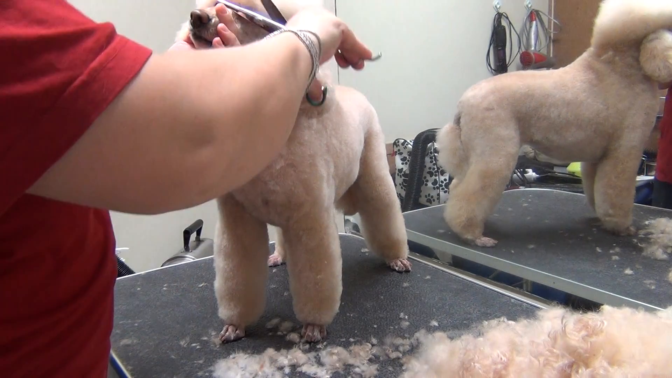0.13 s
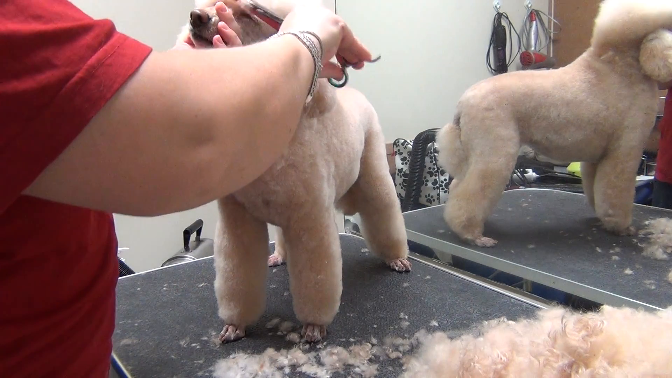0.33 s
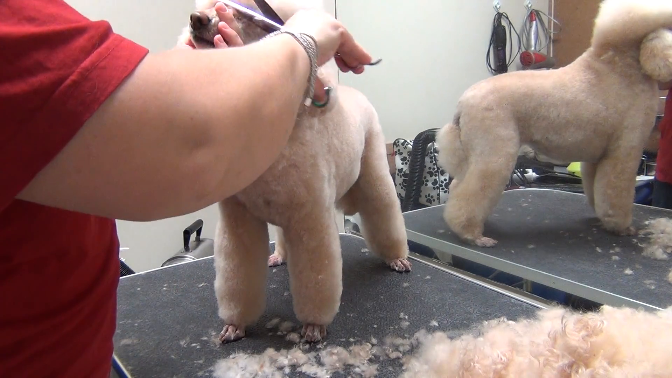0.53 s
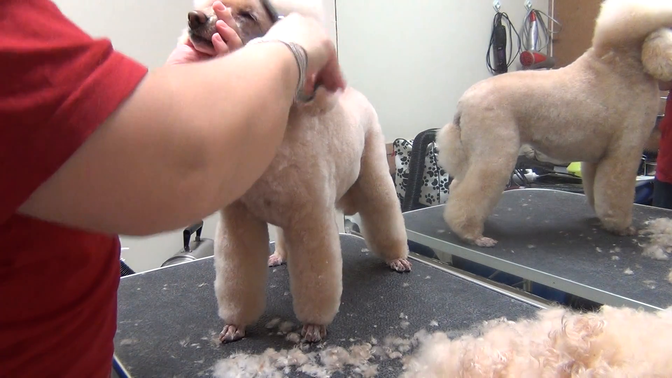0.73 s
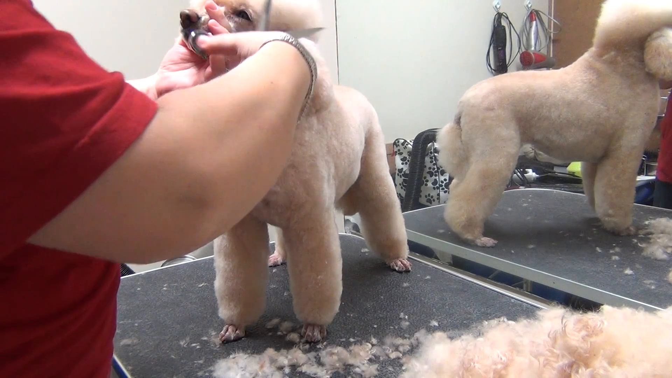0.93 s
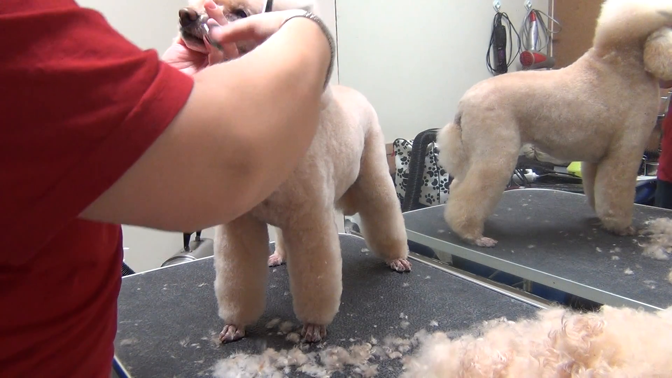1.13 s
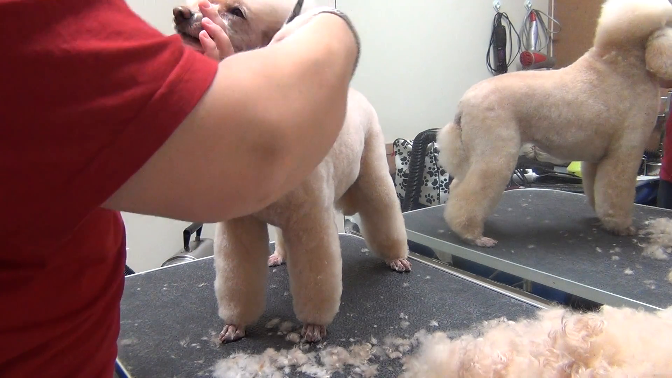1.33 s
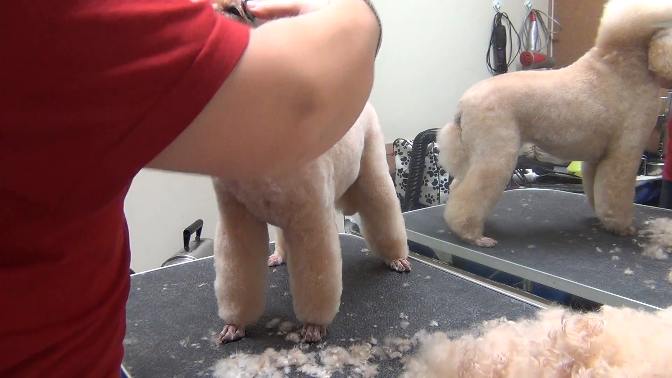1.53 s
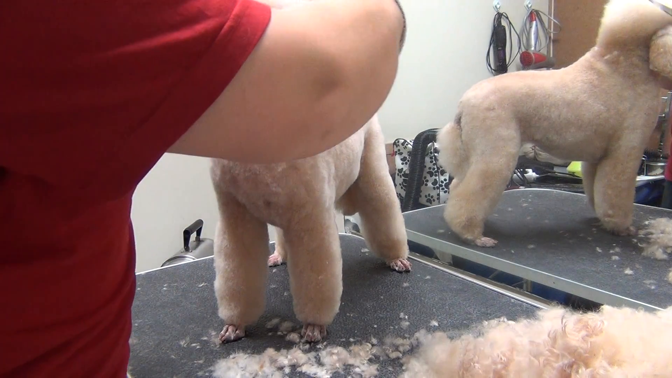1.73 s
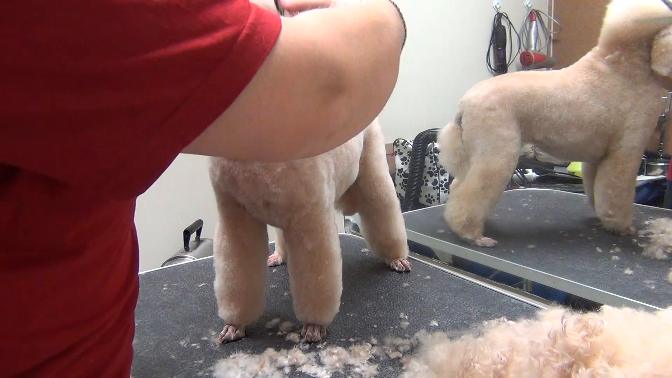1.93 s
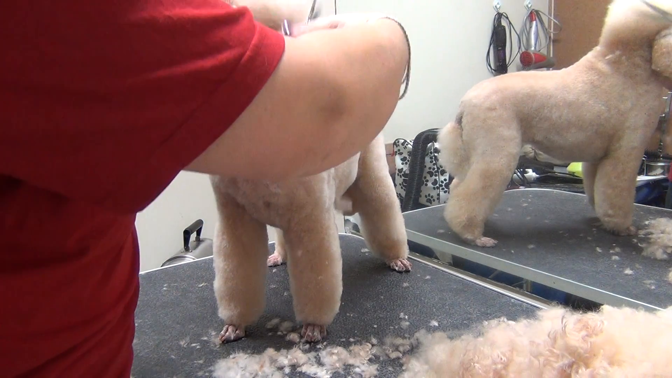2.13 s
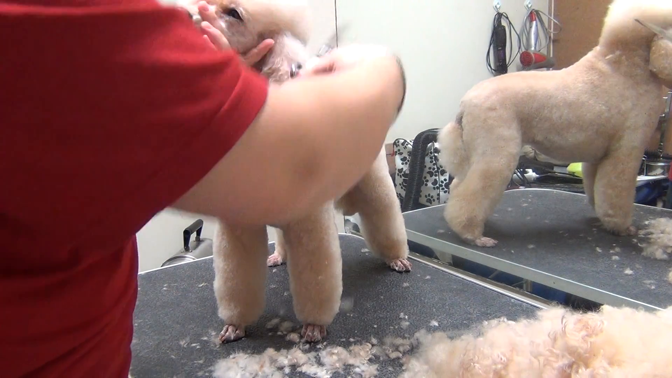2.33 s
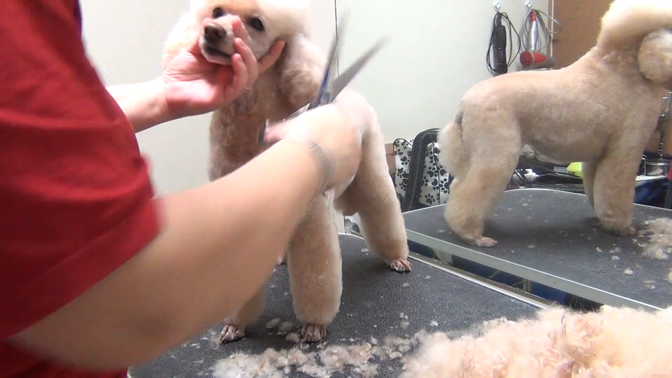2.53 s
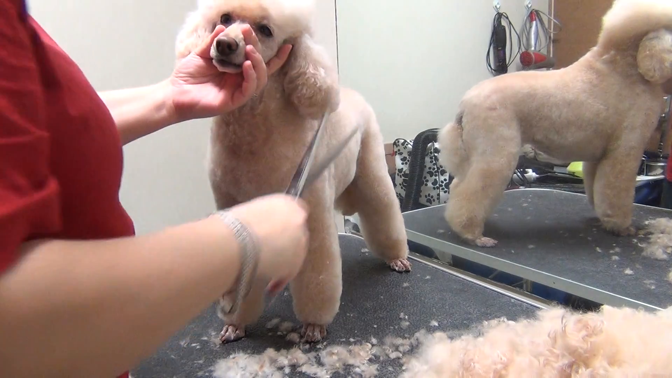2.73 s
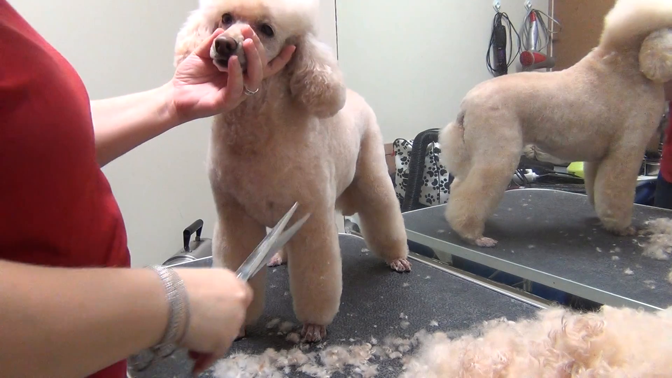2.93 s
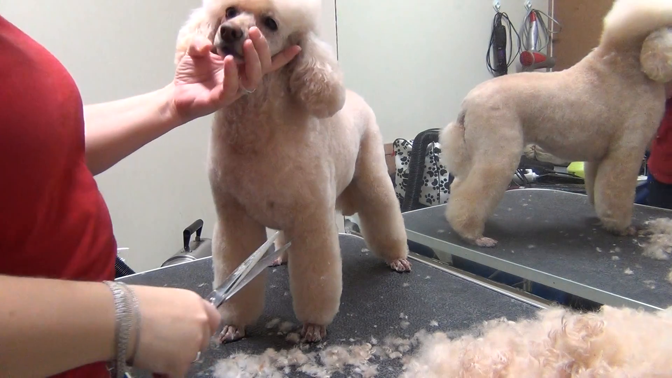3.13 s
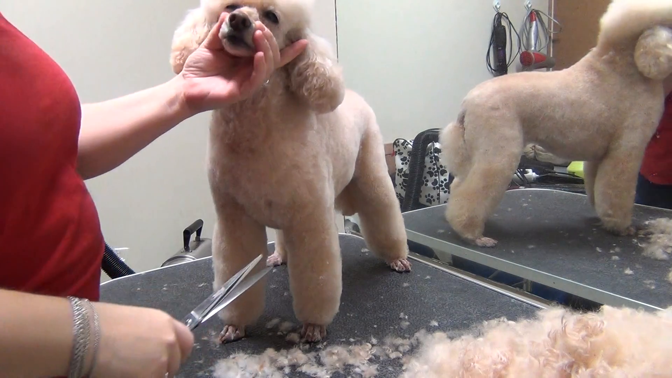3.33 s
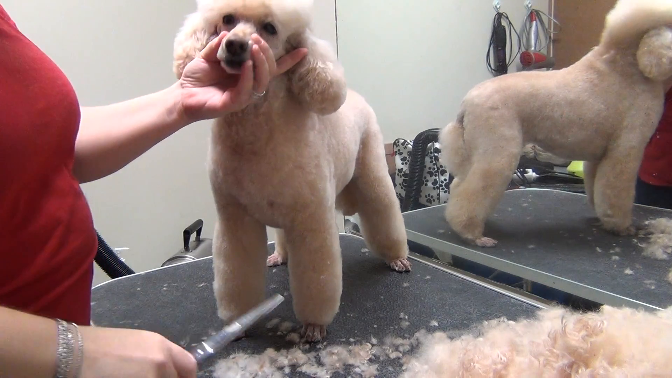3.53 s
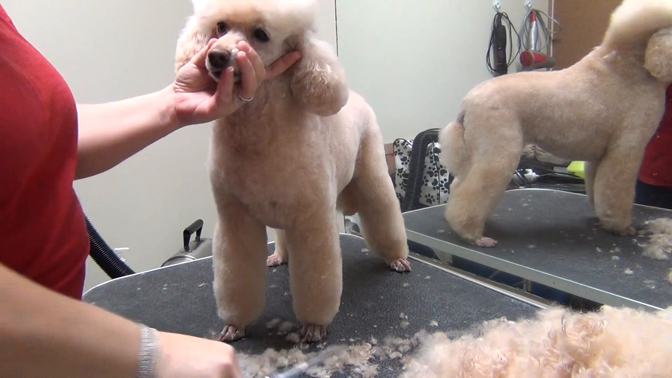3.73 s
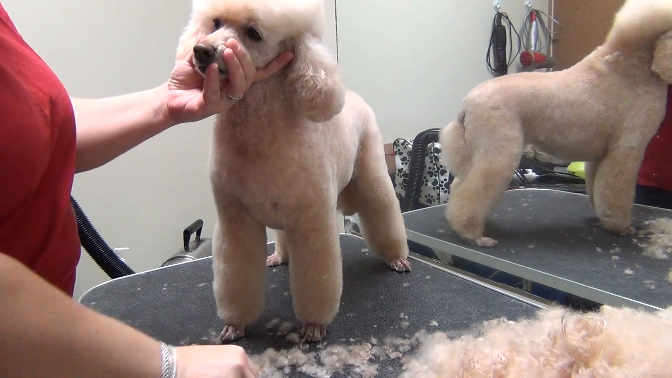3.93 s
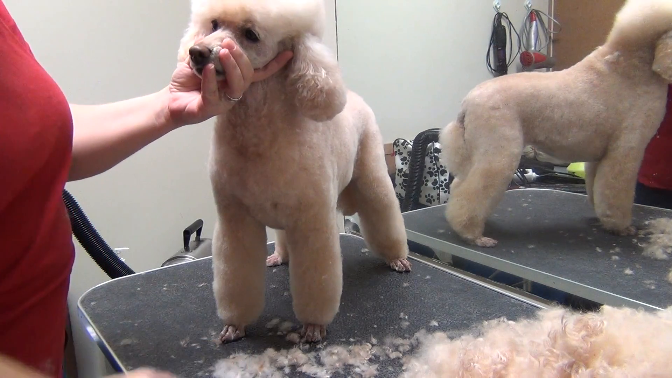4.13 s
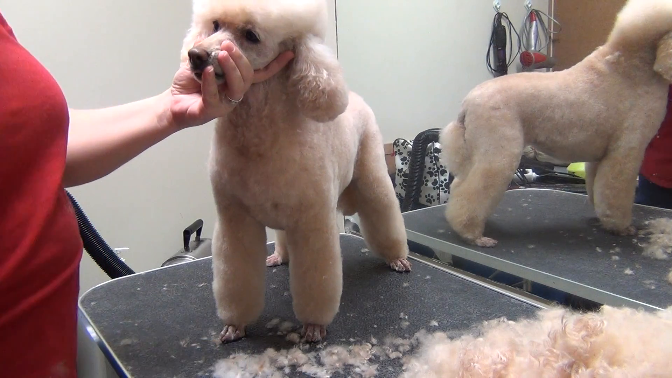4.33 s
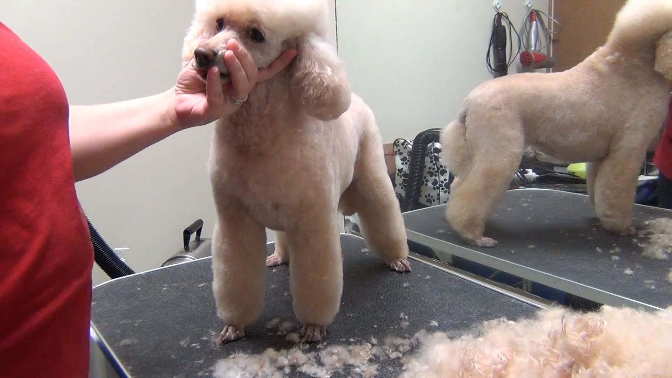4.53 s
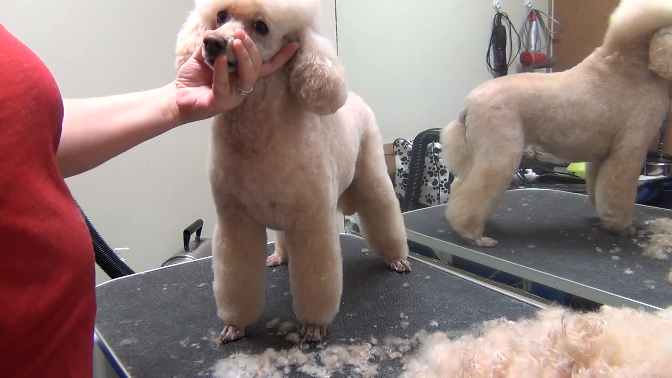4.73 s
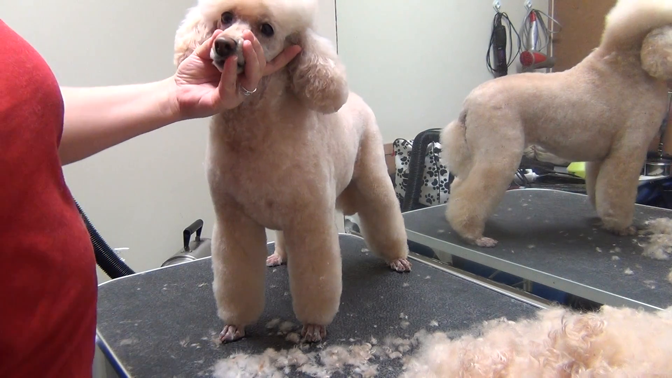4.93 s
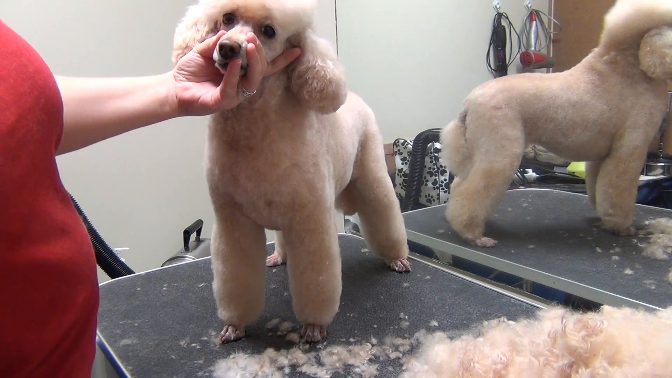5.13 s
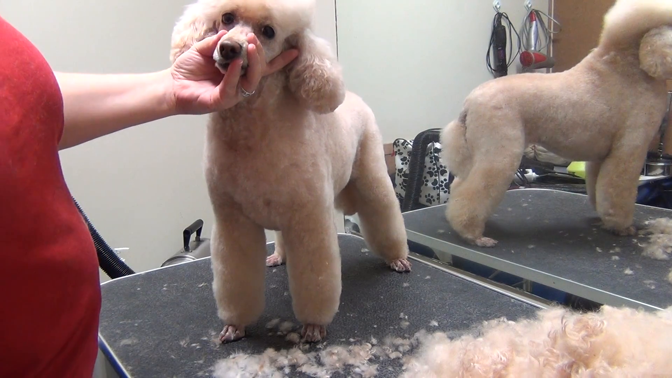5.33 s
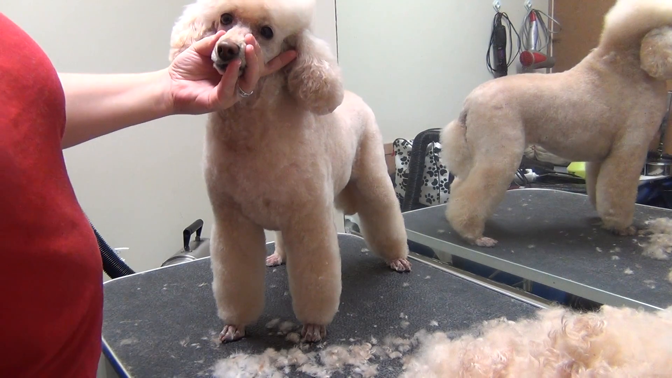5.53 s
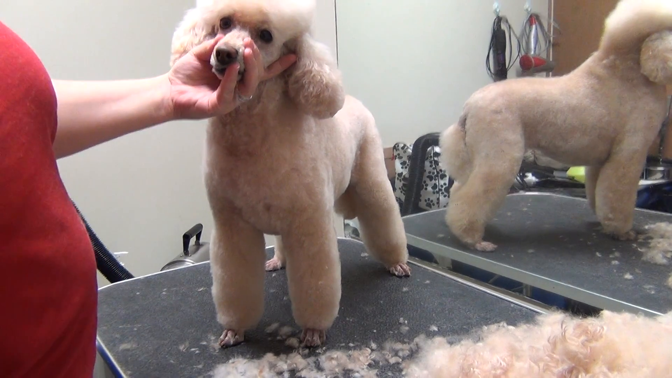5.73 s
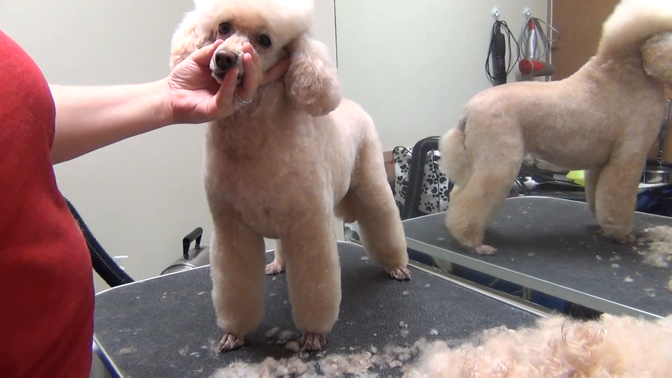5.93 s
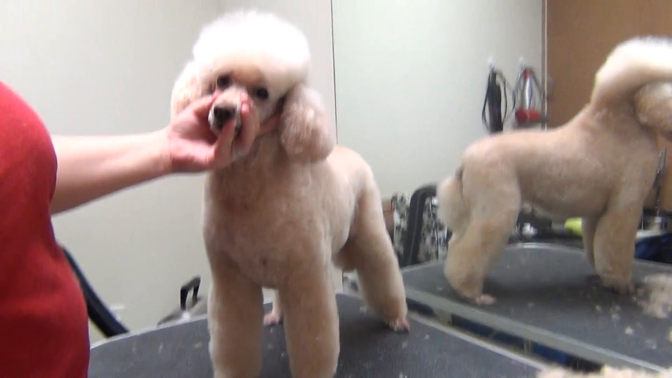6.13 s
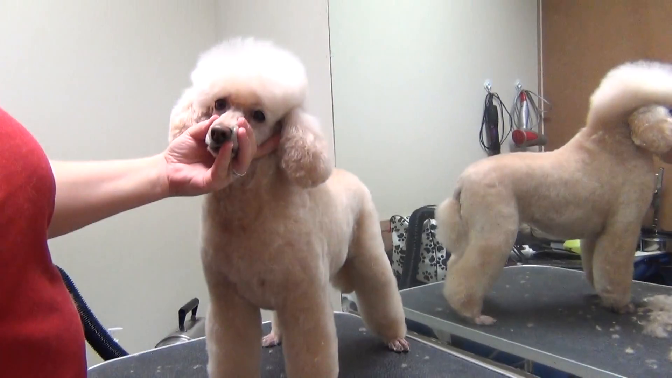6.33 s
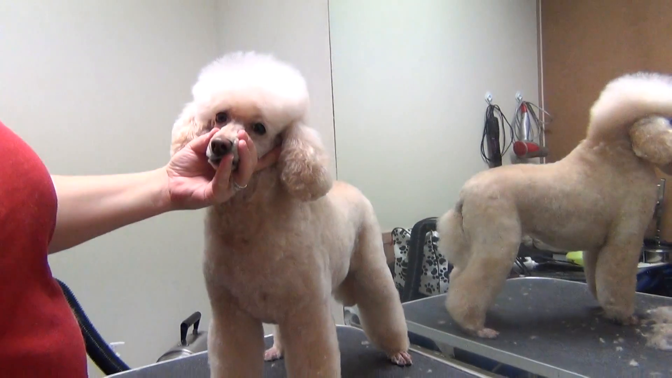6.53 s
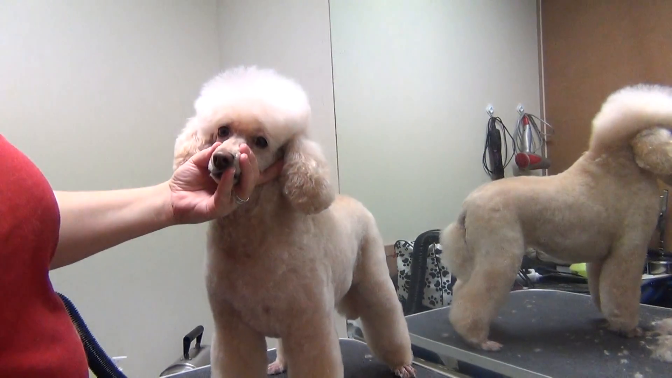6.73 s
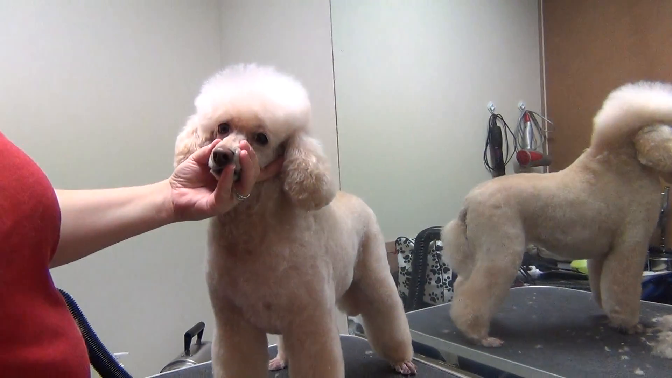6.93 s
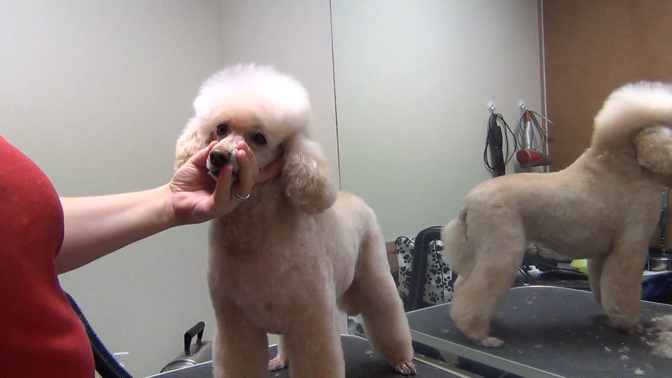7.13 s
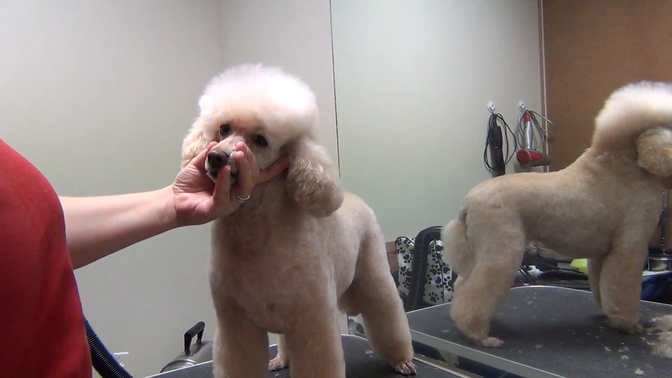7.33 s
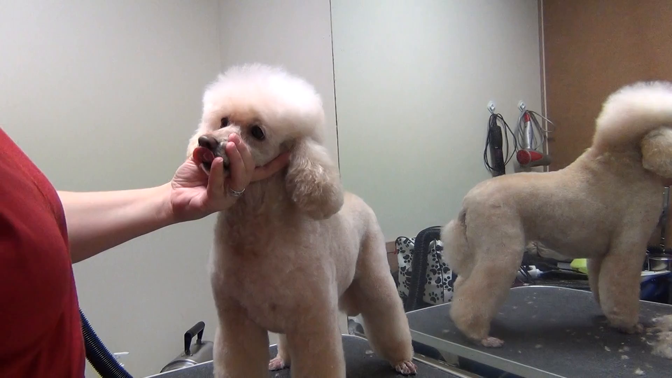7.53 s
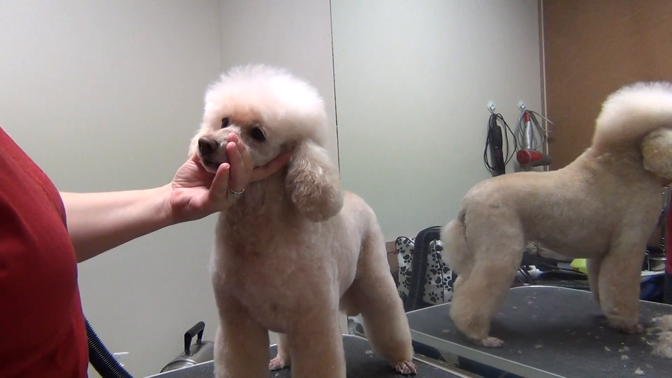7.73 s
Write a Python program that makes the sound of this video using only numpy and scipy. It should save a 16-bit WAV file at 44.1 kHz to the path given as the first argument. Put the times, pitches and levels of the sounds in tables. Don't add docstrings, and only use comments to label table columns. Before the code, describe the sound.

In a small hard-walled room, steel scissors snip through curly dog hair with bright, briefly ringing clicks and fine scrapes. After a pause they drop and rattle on a hollow table. Cloth rustles, light taps follow, then plastic creaks and clacks very close to the microphone. It ends with faint taps, rubbing and soft low knocks over quiet airflow.

```python
import sys
import numpy as np
from scipy import signal
from scipy.fft import rfft, irfft, next_fast_len
from scipy.io import wavfile
from scipy.ndimage import uniform_filter1d

SR = 44100
rng = np.random.default_rng(int(sys.argv[2]) if len(sys.argv) > 2 else 0)


def nominal_scale(level):
    x = np.asarray(level, float) / 20
    return 10 ** x


def bounce(signal):
    frames = np.transpose(np.atleast_2d(signal))
    limited = np.clip(frames, -1, 1)
    pcm = np.round(limited * 32767).astype(np.int16)
    wavfile.write(sys.argv[1], SR, pcm)


N = 347067
SPAN, LEAD = 24576, SR // 10
HZ = np.fft.rfftfreq(SPAN, 1 / SR)
T = (np.arange(SPAN) - LEAD) / SR

# f/Hz, left-right level/dB
PORT_LEAN = [(60, -4.5), (120, -4), (250, -2.5), (600, -.4), (2000, 0)]


def unit(x):
    return x / np.sqrt(np.mean(x ** 2) + 1e-20)


def along(points, hz):
    f, v = np.transpose(points)
    return np.interp(np.log(hz + 1), np.log(f + 1), v)


def level_curve(times, levels_db):
    return nominal_scale(np.interp(np.arange(N) / SR, times, levels_db, -200, -200))


def bandwidth(t60):
    return np.log(1000) / np.pi / t60


def causal(points):
    cepstrum = irfft(np.log(nominal_scale(along(points, HZ)) + 1e-6))
    half = SPAN // 2 - 1
    fold_forward = np.r_[1, np.full(half, 2), 1, np.zeros(half)]
    return np.exp(rfft(cepstrum * fold_forward))


def resonances(modes, drift=0):
    total = 0
    for k, (hz, width, db) in enumerate(modes):
        centre = hz * (1 + drift * rng.standard_normal())
        strength = nominal_scale(db + 2.5 * rng.standard_normal())
        damping = 1j * HZ * width
        total = total + (-1) ** k * strength * damping / (centre ** 2 - HZ ** 2 + damping)
    return total


def pair(z, hz, alike):
    turn = np.arccos(np.clip(along(alike, hz), 0, .995)) / 2
    mid, side = z[0] * np.cos(turn), z[1] * np.sin(turn)
    lean = along(PORT_LEAN, hz) / 2
    return np.array([(mid + side) * nominal_scale(lean), (mid - side) * nominal_scale(-lean)])


def rush(spectrum, patchy_db, grain_db, smooth_hz=30000):
    # f/Hz, left-right likeness
    field_likeness = [(50, 0.442), (130, 0.8076), (290, 0.8354), (640, 0.91897), (1410, 0.9333),
                      (3100, 0.94763), (6820, 0.8435), (15000, 0.965)]
    grains = nominal_scale(grain_db * np.repeat(rng.exponential(size=N // 64 + 1), 64)[:N])
    z = signal.stft(grains * rng.standard_normal((2, N)), nperseg=512)[2]
    patches = uniform_filter1d(rng.standard_normal(z.shape[1:]), size=6, axis=0)
    patches = unit(uniform_filter1d(patches, size=10, axis=1))
    bins = np.fft.rfftfreq(512, 1 / SR)[:, None]
    depth_db = patchy_db / (1 + (bins / smooth_hz) ** 2)
    x = signal.istft(z * nominal_scale(depth_db * patches), nperseg=512)[1][:, :N]
    m = next_fast_len(N)
    hz = np.fft.rfftfreq(m, 1 / SR)
    coloured = rfft(x, m) * nominal_scale(along(spectrum, hz))
    return unit(irfft(pair(coloured, hz, field_likeness), m)[:, :N])


def burst(t60, slide=1e-4, slide_db=0, rough_db=4):
    swell = nominal_scale(slide_db + 20 * T / abs(slide))
    chatter = nominal_scale(-60 * abs(T) / abs(t60))
    grit = nominal_scale(rough_db * np.repeat(rng.standard_normal(SPAN // 32), 32))
    return rfft(np.where(T < 0, swell, chatter) * grit * rng.standard_normal(SPAN))


def add(out, s, sound, db, wet_db, pan_db=0):
    # f/Hz, t60/s
    room_decay = [(200, 0.40405), (2000, 0.25414), (8000, 0.22755), (14000, 0.14813)]
    # f/Hz, level/dB
    wall_colour = [(100, -1), (1000, 1.5), (3000, -2.5), (5000, -3), (7500, 0), (12000, -5.5)]
    # f/Hz, likeness
    wall_likeness = [(100, .85), (1000, .88), (3000, .85), (6500, .6), (9000, .68), (14000, .8)]
    hz, t, z = signal.stft(rng.standard_normal((2, SR // 2)), SR, nperseg=256)
    decay = nominal_scale(-60 * t / along(room_decay, hz)[:, None])
    tail = signal.istft(z * decay, SR, nperseg=256)[1]
    tail = np.pad(tail / np.linalg.norm(tail[0]), ((0, 0), (200, 0)))
    direct = nominal_scale((along(PORT_LEAN, HZ) + pan_db) / [[2], [-2]])
    walls = nominal_scale(wet_db + along(wall_colour, HZ)) * pair(rfft(tail, SPAN), HZ, wall_likeness)
    x = irfft(sound * (direct + walls))
    piece = out[:, round(s * SR) - LEAD:][:, :SPAN]
    piece += nominal_scale(db) / abs(irfft(sound)).max() * x[:, :piece.shape[1]]


def steel(shank_db, pivot_db, tone):
    # f/Hz, width/Hz, level/dB
    blade_modes = [(6695.6, 68, -22.5), (7234.1, 105.54, 0), (7400, 33, -42), (7700, 185.2, 4.5),
                   (8370, 214.8, -6), (8560, 191.4, 3.5), (9561.5, 92.5, 2.5), (10194, 36, -10.5),
                   (10517, 401.2, -8.5), (11704, 70.74, -3.5), (13750, 155, -40.5)]
    # f/Hz, width/Hz, level/dB
    shank_modes = [(2050, 131.5, -12), (2876, 337.6, 1), (3300, 372, -10), (3740.7, 639, -15.5)]
    # f/Hz, width/Hz, level/dB
    pivot_modes = [(4400, 600, -1), (5100, 600, 0), (5800, 500, -2)]
    # f/Hz, level/dB per Hz
    dense_modes = [(3240, -20), (5500, -14.5), (6550, -3.5), (7720, 1.5), (8710, -1), (11100, -25),
                   (13100, -12.5), (16000, -31.5)]
    # f/Hz, level/dB
    dull_knock = [(200, -106), (500, -22.5), (1000, -7.5), (2500, -14), (4500, -1.5), (7000, -11),
                  (12000, -61.5)]
    wash = causal([(1000, -83.5)] + dense_modes)
    blades = nominal_scale(-0.5) * resonances(blade_modes, drift=0.029534)
    blades = blades + resonances([tone])
    pivot = nominal_scale(pivot_db + 9.5) * resonances(pivot_modes, drift=0.05703)
    shanks = resonances(shank_modes, drift=0.00893) + nominal_scale(-6.0) * causal(dull_knock)
    return wash + blades + pivot + nominal_scale(shank_db + 9.0) * shanks


def scissors():
    # t/s, catch level/dB, shank share/dB, pivot share/dB, loudest f/Hz
    closings = [
        (0.4038, -23, -14.5, -15, 8249),
        (0.737, -40, -15.5, -11, 8449),
        (1.3036, -27.5, -11.5, -13, 7853),
        (1.7225, -27.5, -11, -23, 8370),
        (2.0729, -26.5, -12.5, -25, 7796),
        (2.3014, -25.5, -12, -21.5, 7435),
        (2.3184, -28.5, -20, -27, 7529),
        (2.7676, -56.5, -13.5, -16, 7322),
    ]
    # t/s, catch level/dB, shank share/dB, pivot share/dB, loudest f/Hz
    openings = [
        (0.5617, -39, -29, -20.5, 7694),
        (0.8954, -33.5, -30.5, -18, 8055),
        (1.4355, -34, -25, -15.5, 7521),
        (1.6935, -30.5, -33, -27.5, 8228),
        (1.8485, -40, -34.5, -24, 8068),
        (2.1952, -35.5, -23.5, -18.5, 7776),
        (2.462, -35, -30.5, -22.5, 7903),
        (3.566, -40.5, -26.5, -14.5, 7984),
    ]
    # t/s, peak level/dB, loudest f/Hz, swell/s, handle share/dB
    scrapes = [(0.3301, -46, 8466, 0.03673, -32), (0.359, -41, 8282, 0.036, -28),
               (0.396, -40, 8582, 0.01731, -18), (0.5495, -41.5, 7029, 0.0101, -38),
               (0.704, -51.5, 7258, 0.01321, -26.5), (0.7217, -41.5, 7084, 0.01168, -22),
               (0.7418, -40, 8254, 0.01048, -20.5), (0.748, -37.5, 7990, 0.005, -19.5),
               (0.8853, -42, 7432, 0.00682, -40.5), (1.258, -46.5, 7424, 0.02774, -25.5),
               (1.2681, -42.5, 8080, 0.00972, -22.5), (1.2841, -40, 8312, 0.01147, -29),
               (1.321, -42, 7895, 0.0061, -22), (1.428, -42, 7917, 0.01285, -34.5),
               (1.68, -47, 7179, 0.0178, -22.5), (1.7173, -32.5, 8370, 0.00403, -24.5),
               (1.737, -35, 8560, 0.00567, -25), (1.858, -38.5, 8054, 0.02402, -31.5),
               (2.041, -48, 6691, 0.01177, -21), (2.0557, -34.5, 8364, 0.00376, -23),
               (2.085, -38.5, 7700, 0.00443, -14.5), (2.187, -42.5, 9595, 0.01357, -38),
               (2.275, -46, 6489, 0.00826, -26), (2.2876, -35.5, 9229, 0.004157, -32.5),
               (2.4482, -41, 7115, 0.00381, -41), (2.834, -57, 6934, 0.0265, -29),
               (3.537, -49, 7400, 0.01696, -24.5), (3.558, -45.5, 8165, 0.0089, -34)]
    # t/s, peak level/dB, handle share/dB, chatter t60/s, loudest f/Hz
    bounces = [
        (3.936, -23.5, 9, 0.0414, 8422),
        (3.9403, -26, -18.5, 0.03823, 5964),
        (3.9407, -20, -11.5, 0.13376, 8400),
        (3.9835, -24, -17.5, 0.0545, 8560),
        (4.0039, -16.5, -26.5, 0.03136, 8663),
        (4.019, -21, -34.5, 0.1082, 8685),
        (4.0374, -24.5, -47, 0.0731, 7529),
        (4.05, -24.5, -30.5, 0.12654, 7500),
        (4.5953, -37, -51, 0.00585, 8432),
    ]
    # f/Hz, width/Hz, level/dB
    handle_modes = [(2050, 244.5, 0.5), (2414.2, 84, 3), (2598.3, 88.8, 7), (4150, 691.7, -8)]
    # f/Hz, level/dB
    touch_colour = [(300, -26), (1500, -14), (6000, 11.5), (13000, 5)]
    # t/s, peak level/dB, f/Hz, t60/s
    lone_rings = [
        (.739, -43, 4733, 0.1812),
        (0.739, -47, 5163, 0.1697),
        (.893, -54, 4150, 0.0551),
        (1.866, -54.5, 4685, 0.0435),
        (2.463, -54.5, 4238, 0.071),
        (4.04, -32, 10640, 0.06054),
        (4.39, -52, 807, 0.0432),
        (5.752, -58.5, 5800, 0.03363),
        (6.987, -45, 277.3, 0.02538),
    ]
    out = np.zeros((2, N))
    for strokes, chatter_t60 in ((closings, 0.06498), (openings, 0.07167)):
        for s, db, shank_db, pivot_db, hz in strokes:
            ring = steel(shank_db, pivot_db, (hz, 160, 5))
            click = nominal_scale(shank_db + 6.0) * burst(0.004574) * causal(touch_colour)
            contact = burst(chatter_t60, 0.00586, -4) + 1.1393 * burst(0.001173)
            add(out, s, contact * ring + click, db, wet_db=-2.0)
    for s, db, hz, swell, handle_db in scrapes:
        edges = steel(handle_db, handle_db + 8, (hz, 200, 3))
        add(out, s, burst(0.10937, swell, 0, 2.674) * edges, db, wet_db=-2.5)
    for s, db, handle_db, t60, hz in bounces:
        ring = steel(handle_db - 10.5, -35.5, (hz, 90, 4))
        ring = ring + nominal_scale(handle_db + 8.5) * resonances(handle_modes)
        add(out, s, burst(t60) * ring, db, wet_db=-4.0)
    for s, db, hz, t60 in lone_rings:
        add(out, s, burst(0.01831) * resonances([(hz, bandwidth(t60), 0)]), db, wet_db=-7.0)
    return out


def table():
    # t/s, peak level/dB, dense share/dB, tilt/dB per octave
    blows = [
        (3.937, -35, 5.5, -8.5),
        (3.94, -28.5, -1.5, 0.5),
        (3.984, -32, 4, -3.5),
        (4.003, -31, 0.5, -1.5),
        (4.024, -28, -3, -6.5),
        (4.044, -35, -2, -3.5),
    ]
    # f/Hz, level/dB, t60/s
    panel_modes = [(122.2, -13, 0.3854), (165, -15.5, 0.09823), (211.21, 1, 0.2548), (255.14, -5.5, 0.9596),
                   (262.72, -4, 0.25), (303.37, -4, 0.13445), (408.39, -1.5, 0.3127), (427.88, -6, 0.1912),
                   (565.07, -5, 0.1687), (676.84, -6, 0.11015), (801.12, -9, 0.2398), (1215.6, -12, 0.1654)]
    # f/Hz, level/dB per Hz
    thud_colour = [(40, -50), (90, -5.5), (250, -3.5), (590, -1.5), (1220, -8), (2300, -14), (3300, -12.5),
                   (6000, -77.5)]
    out = np.zeros((2, N))
    thud = causal(thud_colour)
    for s, db, thud_db, tilt_db in blows:
        panel = []
        for hz, mode_db, t60 in panel_modes:
            panel.append((hz, bandwidth(t60), mode_db + tilt_db * np.log2(hz / 256)))
        add(out, s, burst(0.000654) * resonances(panel), db, wet_db=-9.0)
        add(out, s, burst(0.10796) * thud, db + thud_db - 1.0, wet_db=-5.5)
    return out


def mount():
    # t/s, peak level/dB, pitch f/Hz, low body/dB
    clack_slips = [(5.773, -23.5, 5588, -34), (5.7776, -21, 3927, -17.5), (5.787, -28, 2448, -15.5),
                   (5.7956, -14, 4866, -55), (5.7998, -16.5, 5075, -17.5), (5.8506, -26.5, 3553, -16),
                   (5.8578, -25, 8196, -23.5), (5.8616, -33.5, 5454, -16.5), (5.8732, -27.5, 4099, -27.5),
                   (5.904, -30.5, 2048, -24.5), (5.906, -34.5, 2079, -3), (5.9233, -33, 3300, -13),
                   (5.9222, -25.5, 5014, -24.5), (5.932, -28.5, 7400, -35.5), (5.9447, -26.5, 8073, -31.5),
                   (5.952, -23, 3967, -25), (5.9543, -21.5, 2414, -14), (5.9625, -27, 5703, -26.5),
                   (5.984, -30, 5086, -24), (6.0245, -9, 6739, -24.5), (6.0243, -34, 3102, -20.5),
                   (6.0319, -21, 4591, -23.5)]
    # t/s, peak level/dB, pitch f/Hz, low body/dB, chatter t60/s
    tap_slips = [(4.678, -52.5, 8005, -34.5, 0.00961), (4.7065, -57, 2710, -28, 0.01524),
                 (4.7315, -43.5, 8553, -15, 0.0095), (4.8316, -52.5, 2430, -15, 0.1448),
                 (4.9749, -45.5, 2346, -5.5, 0.177), (4.98, -48.5, 5110, -20, 0.2335),
                 (5.015, -49.5, 5420, -18, 0.0954), (5.0274, -56.5, 2388, -23.5, 0.04515),
                 (5.0966, -46, 2050, -27.5, 0.03226), (5.11, -48.5, 2003, -20.5, 0.0218),
                 (5.164, -51, 4803, -22, 0.0201), (5.175, -54.5, 1903, -21.5, 0.0771),
                 (5.2393, -54.5, 3539, -24, .02), (5.5785, -53, 4773, -28.5, 0.08),
                 (5.659, -49.5, 5105, -26.5, 0.0782), (5.678, -46.5, 2996, -11, 0.0213),
                 (5.689, -41, 4955, -17.5, 0.03608), (6.2024, -51.5, 1523, -6.5, 0.0595),
                 (6.534, -56.5, 9495, -40, .008), (6.8535, -43.5, 4250, -20, 0.0205),
                 (6.8694, -52, 2070, -8.5, 0.02935), (6.8853, -53, 5062, -10, .05),
                 (6.9187, -45.5, 2044, -15, 0.03307), (6.9435, -41, 6270, -16, .03),
                 (6.95, -46, 5472, -18.5, 0.1223), (6.9655, -44.5, 5000, -29, .03),
                 (6.9673, -36.5, 1892, -18, 0.0362), (6.9875, -49, 1500, 0, 0.02005)]
    # f/Hz, level/dB per Hz
    crack_colour = [(200, -48.5), (880, -20), (1500, -12.5), (1930, 1), (4110, -5), (4520, -3.5),
                    (4930, -3), (8070, -4), (10000, -21), (13000, -30), (22000, -120)]
    # f/Hz, level/dB
    shell_colour = [(80, -49), (250, -13), (500, -9.5), (1000, 2.5), (1800, 5), (3000, -0.5), (6000, -73.5)]
    # f/Hz, level/dB
    edge_colour = [(3000, -71.5), (6000, -28.5), (9000, -15.5), (13000, -22.5), (16000, -16.5)]
    out = np.zeros((2, N))
    crack, shell, edge = causal(crack_colour), causal(shell_colour), causal(edge_colour)
    clacks = [(*row, 0.02) for row in clack_slips]
    # sharp edge/dB, own pitch/dB, its width over its frequency
    kinds = ((clacks, -21, 6, 0.1224), (tap_slips, -41.5, 11.67, 0.2624))
    for slips, sharp_db, pitch_db, relative_width in kinds:
        for s, db, hz, low_db, t60 in slips:
            own = 1 + resonances([(hz, relative_width * hz, pitch_db)])
            body = crack * own + nominal_scale(low_db + 14.5) * shell + nominal_scale(sharp_db + 15.5) * edge
            chatter = burst(t60, 0.0010791, 11.027, rough_db=1.5)
            release = 1.6844 * burst(0.003, 0.0004899, -9.5)
            add(out, s, (chatter + release) * body, db + 1.5, wet_db=-21, pan_db=rng.normal(0, 1))
    return out


def thumps():
    # t/s, peak level/dB, f/Hz, t60/s
    knocks = [(4.4, -69.5, 264, 0.178), (4.967, -59, 145.7, 0.1659), (5.239, -61.5, 87.22, 0.1388),
              (5.582, -56.5, 139.4, 0.2126), (5.619, -65, 133.5, 0.0629), (5.85, -53, 90.14, 0.0918),
              (6.188, -58, 325, 0.01438), (6.966, -59.5, 140, 0.1267), (6.995, -56, 136.6, 0.1356),
              (7.578, -61, 191.6, 0.1396), (7.62, -53, 169.4, 0.0561), (7.648, -48.5, 149.3, 0.084),
              (7.708, -51.5, 165, 0.0359)]
    out = np.zeros((2, N))
    for s, db, hz, t60 in knocks:
        soft = resonances([(hz, bandwidth(t60), 0)]) / (1 + 1j * HZ / 500)
        add(out, s, burst(.06, .008, 0, rough_db=1) * soft, db, wet_db=-4.0)
    return out


def sleeve():
    # f/Hz, level/dB per Hz
    fold_colour = [(88, -43.5), (150, -19.5), (304, -1), (367, -4.5), (443, 0), (661, -3.5), (2500, -12),
                   (3250, -47), (5500, -120)]
    # f/Hz, level/dB per Hz
    brush_colour = [(710, -19), (1200, -8), (2410, -1.5), (2820, -1), (3960, -0.5), (4360, -2.5), (7230, 4),
                    (10600, -7.5), (15000, -38)]
    # t/s, brush level/dB, rise/s and fall/s per 20 dB, fold over brush/dB
    movements = [(3.2, -72.5, 0.1958, 1, 1.5), (3.564, -68.5, 0.1147, -7.3231, 1),
                 (3.9, -75, 0.204, 8.5, -23.5), (4.131, -54.5, 0.2502, 0.4011, -2),
                 (4.394, -72.5, 0.0254, -7.5, -6), (4.63, -74.5, 0.03, 2, 3),
                 (4.977, -60.5, 0.00629, 0.1178, 4), (5.03, -66, 0.1034, -0.1498, 2.5),
                 (5.17, -66.5, 0.0595, 0.0619, 7), (5.3, -66.5, 0.894, 0.5, 5),
                 (5.592, -56.5, 0.01583, 0, -1.5), (5.69, -68.5, 0.0914, -0.6106, -17),
                 (5.76, -67, 0.0232, -0.6857, 4), (6.05, -75, 2.306, -0.0031, -22.5),
                 (6.962, -63, 0.0735, -0.2967, -3), (7.45, -69, 0.315, 1.63, 1),
                 (7.005, -68, 0.0263, 0.1966, -12.5), (7.6, -63.5, 0.08, 0.2558, -6.5),
                 (7.715, -59.5, 0.0516, -0.0419, -5), (7.748, -61.5, 0.0881, -3.2252, -8),
                 (7.87, -57.5, 0.01584, -2, -6.5)]
    fold = rush(fold_colour, 3.704, 0.6254)
    brush = rush(brush_colour, 1.5, 1.2)
    s, db, rise, fall, fold_db = np.transpose(movements)[:, :, None]
    since = np.arange(N) / SR - s
    effort = nominal_scale(db - 20 * np.where(since < 0, -since / abs(rise), since / abs(fall)))
    fold_gain = np.linalg.norm(effort * nominal_scale(fold_db), axis=0)
    brush_gain = np.linalg.norm(effort, axis=0)
    return fold_gain * fold + brush_gain * brush


def lens_motor():
    # t/s, f/Hz, level/dB
    motor_run = [
        (6.3, 3070, -81),
        (6.38, 3150, -74.5),
        (6.65, 3400, -73.5),
        (6.85, 3660, -74),
    ]
    t = np.arange(N) / SR
    times, pitches, levels_db = np.transpose(motor_run)
    pulses = np.sin(np.pi * 25 * (t - .003)) ** 6
    phase = 2 * np.pi * np.cumsum(np.interp(t, times, pitches)) / SR
    return level_curve(times, levels_db) * pulses * np.sin(phase)


def air():
    # f/Hz, level/dB per Hz
    flow_colour = [(15, -43), (25, -12), (97, -3), (300, -6.5), (818, -8.5), (1190, -13), (3340, -16.5),
                   (16000, -22)]
    # t/s, level/dB
    flow_level = [
        (0.0, -67.5),
        (2.2, -65),
        (2.87, -66),
        (3.99, -70),
        (5.96, -65),
        (6.2, -68.5),
        (7.87, -69),
    ]
    # f/Hz, level/dB per Hz
    duct_colour = [(600, -120), (800, -11), (890, -3.5), (960, -10), (1200, -120)]
    # f/Hz, level/dB per Hz
    circuit_colour = [(13000, -120), (14100, -15), (14400, -4), (14900, 2.5), (15200, 1), (16500, -120)]
    # f/Hz, rms level/dB
    whine_lines = [(15525, -89.5), (15574, -89), (15625, -82), (15676, -84.5), (15725, -87.5)]
    t = np.arange(N) / SR
    whine = sum(nominal_scale(db + 1.5) * np.sin(2 * np.pi * (hz * t + rng.random())) for hz, db in whine_lines)
    duct = nominal_scale(-78.5) * rush(duct_colour, 1.0, 0)
    hiss = nominal_scale(-80) * rush(circuit_colour, 0.37, 0)
    flow = rush(flow_colour, 1.6, .3, smooth_hz=1500)
    return level_curve(*np.transpose(flow_level)) * flow + duct + hiss + whine


def scene():
    return scissors() + table() + mount() + thumps() + sleeve() + lens_motor() + air()


def low_pass(x):
    return signal.sosfilt(signal.butter(12, 16620, fs=SR, output="sos"), x)


def record(dry):
    # f/Hz, level/dB
    band_limit = [(15750, 0), (15950, -30), (16600, -45)]
    m = next_fast_len(N)
    gain = nominal_scale(along(band_limit, np.fft.rfftfreq(m, 1 / SR)))
    mix = irfft(rfft(dry, m) * gain, m)[:, :N]
    return low_pass(mix)


dry = scene()
out = record(dry)
bounce(out)
```